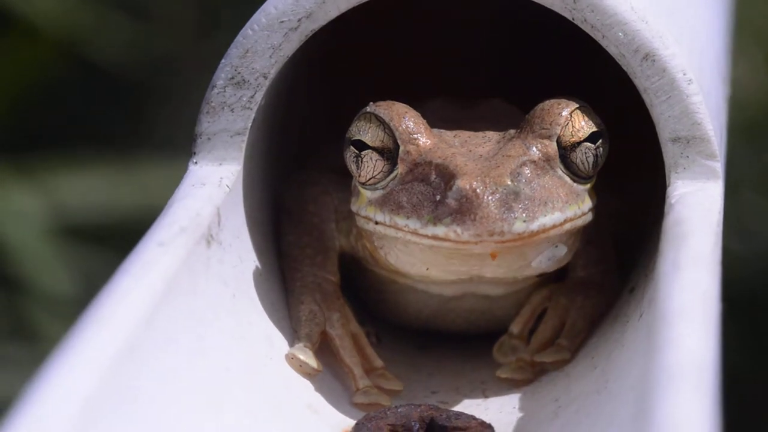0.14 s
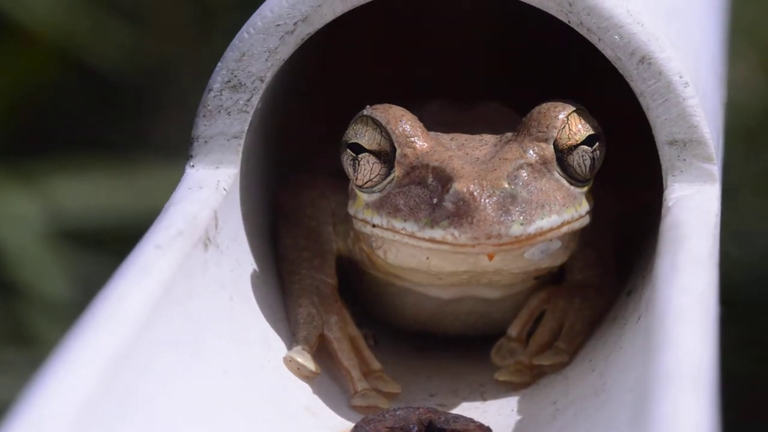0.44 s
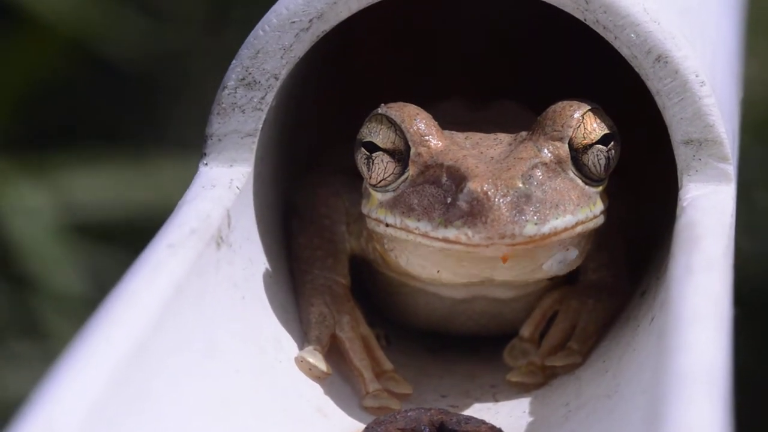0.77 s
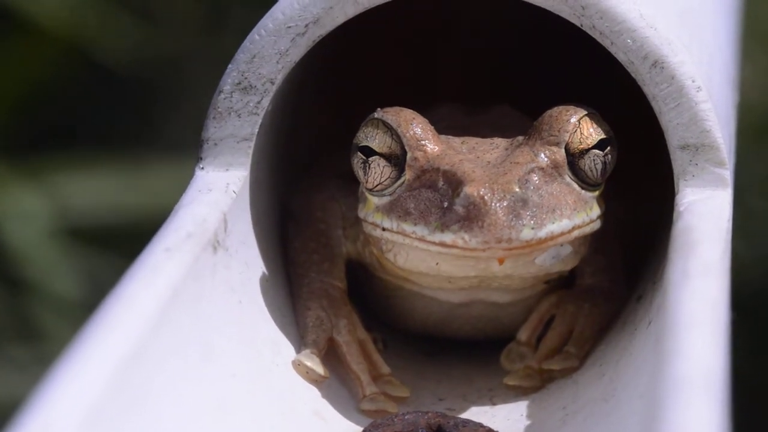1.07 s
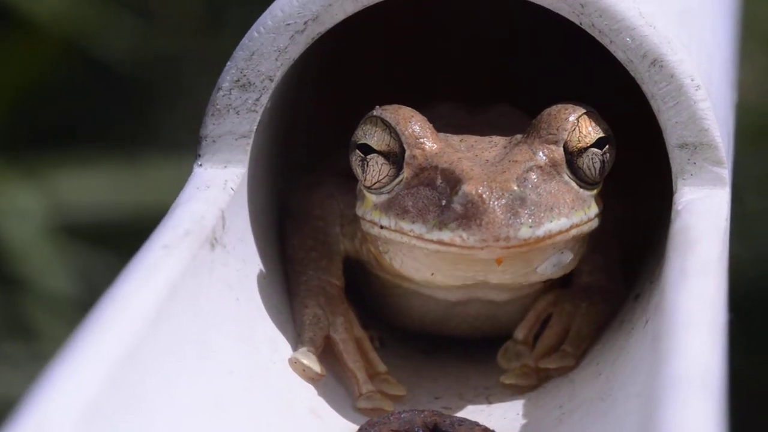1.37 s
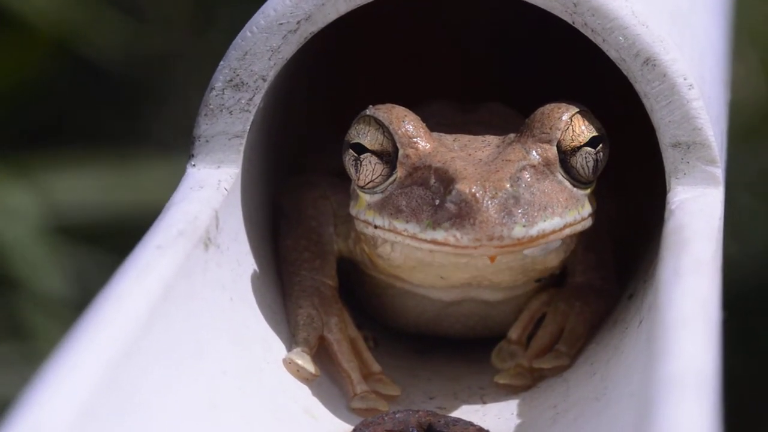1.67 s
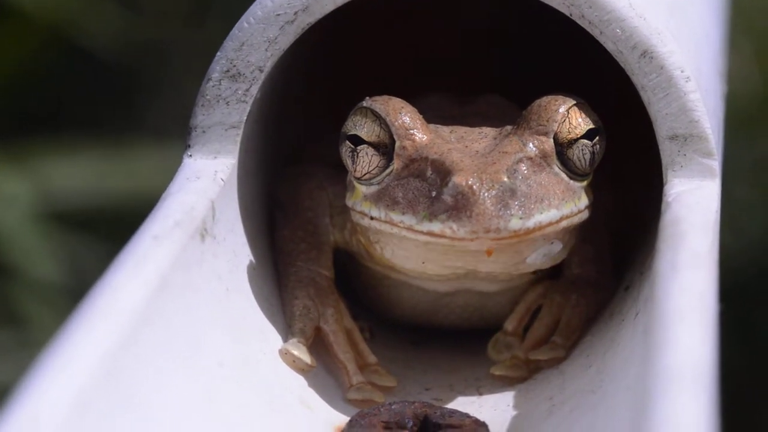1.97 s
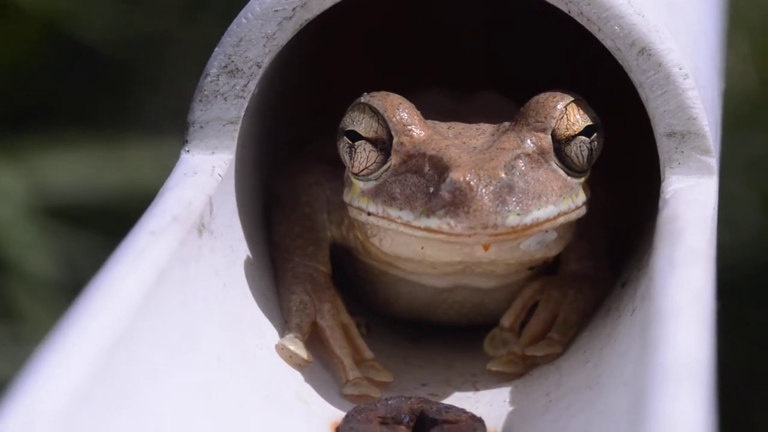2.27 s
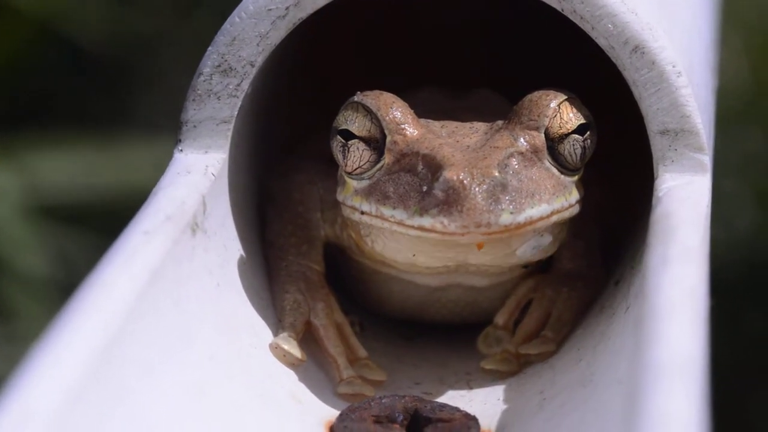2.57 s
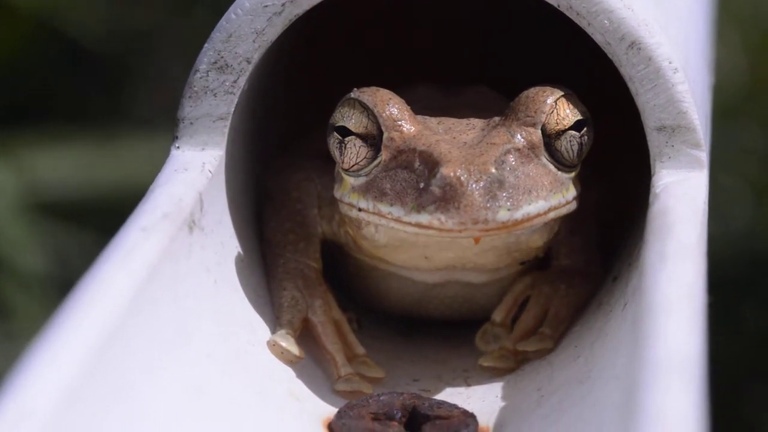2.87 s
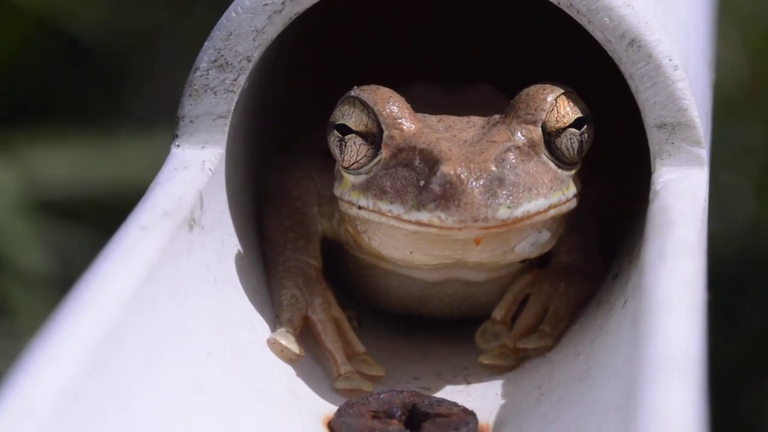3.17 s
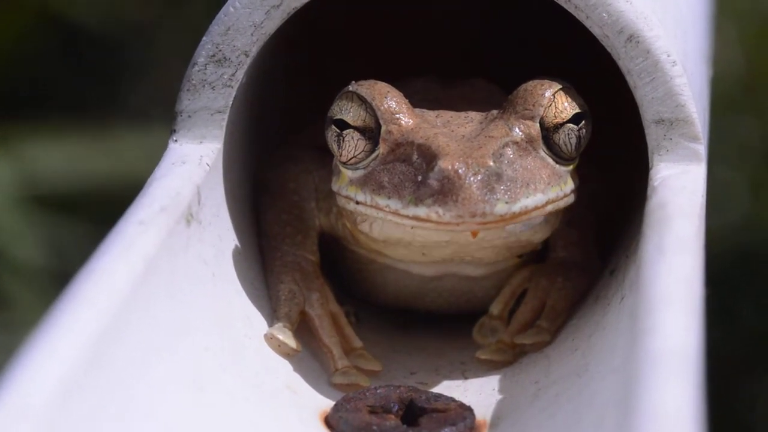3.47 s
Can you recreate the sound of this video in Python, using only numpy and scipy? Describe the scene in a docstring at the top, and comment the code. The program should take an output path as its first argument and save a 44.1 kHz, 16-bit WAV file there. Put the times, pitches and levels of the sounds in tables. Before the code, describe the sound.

A cicada buzzes steadily and high-pitched outdoors over a faint rumble of distant traffic.

```python
"""A garden. A cicada buzzes steadily: about a hundred times a second its tymbal buckles, rib after rib,
and each rib rings as a click. Foliage scatters the buzz. Behind it lie far insects, the drone of distant
traffic and a wash of outdoor air, with some soft ticks, a few faint bird notes and light puffs of wind
on the microphone."""
import sys
import numpy as np
from scipy import signal
from scipy.fft import rfft, irfft
from scipy.io import wavfile
from scipy.ndimage import uniform_filter1d

SR = 44100
rng = np.random.default_rng(int(sys.argv[2]) if len(sys.argv) > 2 else 0)


def unload_wav(signal):
    """Save mono or channel-first audio to the path in sys.argv[1] as 16-bit WAV at rate SR, clipped to [-1, 1]."""
    wavfile.write(
        sys.argv[1],
        SR,
        np.round(np.clip(np.atleast_2d(signal).T, -1, 1) * 32767).astype(np.int16),
    )


N = 160524
TIME, FREQ = np.arange(N) / SR, np.fft.rfftfreq(N, 1 / SR)


def amp(db):
    """Decibels to gain."""
    return 10 ** (np.asarray(db) / 20)


def unit(x):
    """Scale to rms 1."""
    return x / np.sqrt(np.mean(x ** 2) + 1e-20)


def level(points):
    """Gain over time from (t/s, level/dB) points."""
    return amp(np.interp(TIME, *np.transpose(points)))


def colour(points, hz):
    """Gain over frequency from (f/Hz, level/dB) points."""
    points_hz, db = np.transpose(points)
    return amp(np.interp(np.log(hz + 1), np.log(points_hz), db))


def band(hz, width_hz):
    """Noise in one steep-sided resonance, rms 1; at 0 Hz, a random drift."""
    rolloff = (1 + ((FREQ - hz) / width_hz * 2) ** 2) ** 1.238
    return unit(irfft(rfft(rng.standard_normal(N)) / rolloff, N))


def bands(table):
    """Sum of noise resonances from (f/Hz, width/Hz, level/dB) rows."""
    return sum(amp(db) * band(hz, width_hz) for hz, width_hz, db in table)


# ribs in buckling order: delay/ms, level/dB, f/Hz, decay time/ms, timing scatter/ms
TYMBAL_RIBS = [(0, 1, 10390, .135, .002), (1.157, -2.8, 9630, .2, .005), (2.122, -1.2, 10500, .155, .013),
               (3.368, -5.7, 9700, .167, .025), (3.949, -11, 9390, .146, .028), (5.0, -9, 10610, .13, .026)]


def tymbal():
    """Each stroke buckles the ribs in a quick run of ringing clicks."""
    stroke_hz, rate_wander, spacing_drift = 102.17, .004, .002
    limp_ms, jitter_ms = .043, .022  # limp: strokes alternate late and early
    scatter_db, drift_db = .32, -.4
    cycles = np.cumsum(stroke_hz * (1 + rate_wander * band(0, 19.46))) / SR
    count = np.arange(int(cycles[-1]))
    jitter, force, *rib_jitters = rng.standard_normal((N // 400, 2 + len(TYMBAL_RIBS)))[:len(count)].T
    stroke_s = np.interp(count + .5, cycles, TIME) + (limp_ms * (-1.) ** count + jitter_ms * jitter) / 1000
    spacing = 1 + spacing_drift * np.interp(stroke_s, TIME, band(0, 4.6))
    clicks = np.zeros(N + SR)
    for (delay_ms, db, hz, decay_ms, scatter_ms), rib_jitter in zip(TYMBAL_RIBS, rib_jitters):
        start_s = stroke_s + (delay_ms * spacing + scatter_ms * rib_jitter) / 1000
        strength = amp(db + scatter_db * force + drift_db * np.interp(stroke_s, TIME, band(0, 6.6)))
        index = np.ceil(start_s * SR).astype(int)[:, None] + np.arange(SR // 300)
        t = index / SR - start_s[:, None]
        age = t * 1000 / decay_ms
        envelope = abs(age) ** 1.29 * np.exp(-age)  # rounded onset
        np.add.at(clicks, index, strength[:, None] * envelope * np.sin(2 * np.pi * hz * t))
    return clicks[:N]


# body response: f/Hz, level/dB
BODY_RESPONSE = [(3000, -49), (6000, -12), (7350, -8.5), (7950, 5.5), (8800, -0.5), (9150, 2), (9430, 2),
                 (9760, 1.5), (10020, -2.5), (10400, 0.5), (10630, -3), (10850, -1.5), (11100, 5.5),
                 (11300, -2.5), (11600, -1.5), (12050, 1), (13000, -3), (15500, -6.5)]
# cicada's effort: t/s, level/dB
BUZZ_EFFORT = [(0.0, -34), (0.02, -30), (0.22, -33), (0.36, -27.5), (0.43, -31), (0.56, -28.5),
               (0.62, -32.5), (0.74, -31.5), (0.78, -27.5), (0.86, -29.5), (1.24, -28.5), (1.29, -27),
               (1.63, -29.5), (1.72, -26), (1.94, -31), (2.14, -28), (2.15, -30), (2.42, -29.5),
               (2.46, -31.5), (2.65, -28.5), (2.93, -29), (2.98, -32.5), (3.05, -26), (3.08, -27.5),
               (3.11, -32), (3.13, -29), (3.43, -30), (3.5, -37.5), (3.52, -32.5), (3.61, -32),
               (3.64, -25.5)]
# top treble relative to the rest of the buzz: t/s, level/dB
TREBLE_LEVEL = [(0, 4), (.1, 2), (.27, -1.5), (.55, 1), (.68, -3), (.85, 3.5), (1.3, 0.5), (1.8, 2.5),
                (2.1, -2.5), (2.55, 1.5), (2.78, -2), (3.04, 0), (3.09, -5), (3.2, 5), (3.3, -2), (3.48, 2),
                (3.56, -4), (3.64, 1)]


def cicada():
    """Rib clicks and membrane fizz, coloured by the body and scattered by leaves."""
    fizz_db, fizz_smear_s, trim_db, foliage_db = -20.5, .002, -.91, -8.5
    lag_ms_per_khz, lag_from_hz, split_hz = .24, 11000, 11600
    clicks = tymbal()
    motion = np.sqrt(abs(uniform_filter1d(clicks ** 2, round(fizz_smear_s * SR))))
    fizz = amp(fizz_db) * motion * band(hz=13500, width_hz=3700)
    spectrum = rfft(clicks + fizz) * colour(BODY_RESPONSE, FREQ)
    lag_s = lag_ms_per_khz * np.maximum(FREQ - lag_from_hz, 0) / 1e6  # late treble: a tiny upward chirp
    spectrum *= np.exp(-2j * np.pi * np.cumsum(lag_s) * SR / N)
    treble = irfft(spectrum / (1 + (split_hz / (FREQ + 1)) ** 30), N)
    core = irfft(spectrum, N) - treble
    gain = level(BUZZ_EFFORT) * amp(trim_db) / np.std(core)
    direct = gain * (core + treble * level(TREBLE_LEVEL))
    return direct + amp(foliage_db) * foliage(gain * core)  # leaves swallow the top treble


def foliage(sound, t60_s=.23, stir_hz=2.3):
    """Reflections from stirring leaves: six short tails, crossfading."""
    t, echoes = TIME[:SR // 2], 0
    for k in range(6):
        tail = rng.standard_normal(len(t)) * amp(-60 * t / t60_s) * (t > .003)
        share = np.cos(2 * np.pi * stir_hz * TIME + np.pi * k / 6) / np.sqrt(3)
        echoes += signal.fftconvolve(sound * share, tail / np.linalg.norm(tail))[:N]
    return echoes


# insect chorus: f/Hz, width/Hz, level/dB
CHORUS_BANDS = [(8565, 30, -53), (8712, 80, -55), (8030, 120, -54), (7170, 60, -71), (9440, 240, -47),
                (9990, 200, -49), (10840, 190, -49), (11290, 200, -54)]


def far_insects():
    """A distant chorus, blurred into steady narrow bands."""
    return bands(CHORUS_BANDS)


# engine resonances: f/Hz, width/Hz, relative level/dB
HUM_BANDS = [(115.7, 41, 0), (148.8, 15.4, -5.5)]
DRONE_BANDS = [(242.7, 82, -0.5), (351.6, 55, -5), (396, 38, -9), (488, 120, -14)]
# engine and tyre envelopes: t/s, level/dB
HUM_ENVELOPE = [(0, -45), (.4, -50.5), (1.1, -51), (1.6, -50), (2.2, -51.5), (2.8, -45), (3.3, -44.5),
                (3.64, -44.5)]
DRONE_ENVELOPE = [(0, -52), (.5, -46), (.76, -41.5), (.85, -37.5), (1.05, -43.5), (1.3, -41), (1.42, -51.5),
                  (2.2, -48), (2.85, -43), (3.3, -37), (3.64, -40)]
TYRE_ENVELOPE = [(0, -55), (2.6, -68), (3.3, -57), (3.64, -43.5)]


def traffic():
    """Distant engines: a low hum, a drone that swells twice, and tyres drawing nearer."""
    hum = unit(bands(HUM_BANDS)) * level(HUM_ENVELOPE)
    drone = unit(bands(DRONE_BANDS)) * level(DRONE_ENVELOPE)
    tyres = band(hz=626, width_hz=330) * level(TYRE_ENVELOPE)
    return hum + drone + tyres


# outdoor background: f/Hz, relative density/dB
AIR_SPECTRUM = [(20, -13), (55, -5), (70, -5), (100, -1.5), (185, 0), (320, -2), (600, 1), (1000, -3),
                (1600, -12), (3000, -19), (5000, -23.5), (15500, -20.5)]


def air(level_db=-44, patch_db=.74):
    """Broad outdoor wash with gently drifting patches."""
    hz, _, spectra = signal.stft(rng.standard_normal(N), SR, nperseg=2048)
    patches = uniform_filter1d(rng.standard_normal(spectra.shape), size=14, axis=0)
    patches = unit(uniform_filter1d(patches, size=5, axis=1))
    spectra *= colour(AIR_SPECTRUM, hz)[:, None] * amp(patch_db * patches)
    return amp(level_db) * unit(signal.istft(spectra, SR, nperseg=2048)[1][:N])


# soft ticks: t/s, ring level/dB, snap level/dB
TICK_EVENTS = [(.2345, -36, -44), (.475, -37, -42), (.6585, -50, -48), (.862, -33, -44), (1.4212, -38, -42),
               (1.7075, -46, -51), (2.9865, -46, -33)]
# ring modes of every tick: f/Hz, relative level/dB, T60/s
RING_MODES = [(1360, -3, 0.022), (1460, -0.5, .02), (1900, -7, 0.025), (2330, -5, 0.039),
              (2490, -1.5, .022)]


def ticks(snap_t60_s=.016, rise_s=.0015):
    """Small dry ticks: a noisy snap and a short ring."""
    track, t = np.zeros(N + SR), TIME[:SR // 20]
    onset = 1 - np.exp(-t / rise_s)
    for start_s, ring_db, snap_db in TICK_EVENTS:
        ring = sum(amp(db - 60 * t / t60_s) * np.sin(2 * np.pi * (hz * t + rng.random()))
                   for hz, db, t60_s in RING_MODES)
        snap = band(hz=2200, width_hz=4400)[:len(t)] * amp(-60 * t / snap_t60_s)
        track[round(start_s * SR):][:len(t)] += (amp(ring_db) * ring + amp(snap_db) * snap) * onset
    return track[:N]


def arch(start_s, length_s):
    """Rounded envelope of one note."""
    progress = np.clip((TIME - start_s) / length_s, 0, 1)
    return np.sqrt(abs(np.sin(np.pi * progress)))


# raspy trills: t/s, length/s, level/dB, f/Hz, width/Hz
BIRD_TRILLS = [(.28, .3, -69, 4130, 260), (.99, .055, -65, 3720, 400), (1.37, .15, -67, 3750, 550),
               (1.41, .11, -64, 3100, 500), (1.665, .016, -62, 3650, 500)]
# falling whistles: t/s, length/s, level/dB, start f/Hz, end f/Hz
BIRD_WHISTLES = [(.7, .075, -62, 3600, 2650), (.99, .065, -57, 3450, 2720), (1.315, .065, -60, 3380, 2700)]


def birds(trill_hz=62, rasp=.0195, flutter_db=7, echo_db=-10):
    """Far birds: pulsing trills and raspy slurred whistles, echoed by foliage."""
    song = np.zeros(N)
    pulses = 1 + 1.9 * np.sin(2 * np.pi * trill_hz * TIME)
    for start_s, length_s, db, hz, width_hz in BIRD_TRILLS:
        song += amp(db) * arch(start_s, length_s) * band(hz, width_hz) * pulses
    for start_s, length_s, db, start_hz, end_hz in BIRD_WHISTLES:
        glide_hz = np.interp(TIME, [start_s, start_s + length_s], [start_hz, end_hz])
        hz = glide_hz * (1 + rasp * band(0, 400))
        envelope = amp(db + flutter_db * band(0, 180)) * arch(start_s, length_s)
        song += envelope * np.sin(2 * np.pi * np.cumsum(hz) / SR)
    return song + amp(echo_db) * foliage(song)


# wind puffs: centre t/s, 1/e half length/s, level/dB
WIND_PUFFS = [(1.23, .04, -55), (1.63, .035, -46), (1.867, 0.067, -50.5), (1.98, .035, -44)]


def wind():
    """Brief low puffs against the microphone."""
    envelope = sum(amp(db) * np.exp(-((TIME - centre_s) / half_s) ** 2)
                   for centre_s, half_s, db in WIND_PUFFS)
    return band(hz=36, width_hz=70) * envelope


def scene():
    """The near cicada over the garden background, mono."""
    return (cicada() + far_insects() + traffic() + air() + ticks() + birds() + wind())[None]


def record(dry, cutoff_hz=15780):
    """Steep low-pass."""
    lowpass = signal.firwin(767, cutoff_hz, window=("kaiser", 9), fs=SR)
    return signal.oaconvolve(dry, lowpass[None], "same")


dry = scene()
out = record(dry)
unload_wav(out)
```